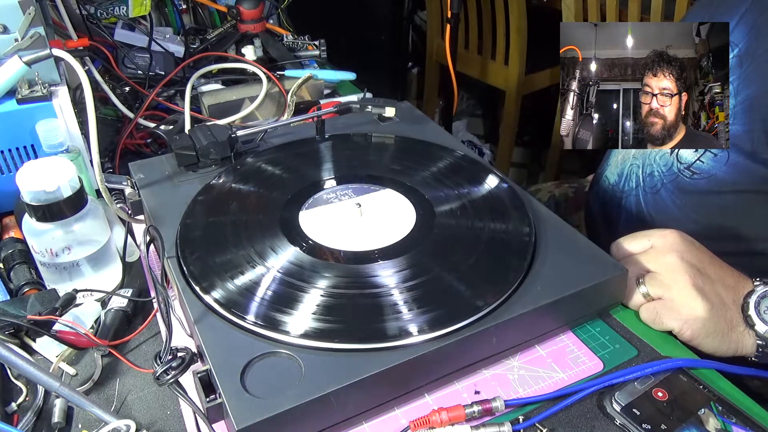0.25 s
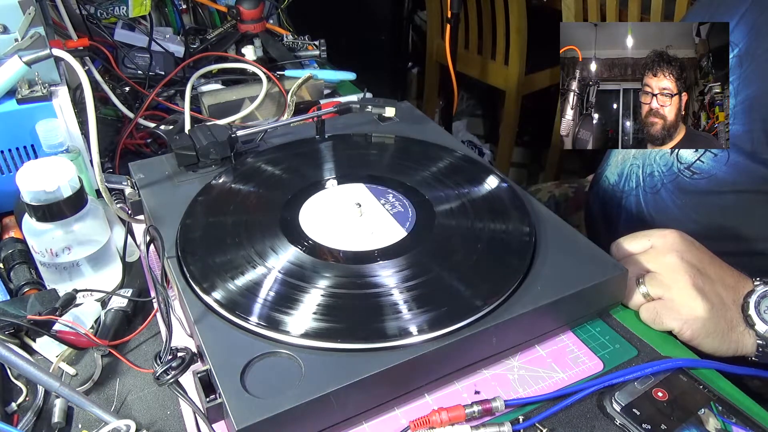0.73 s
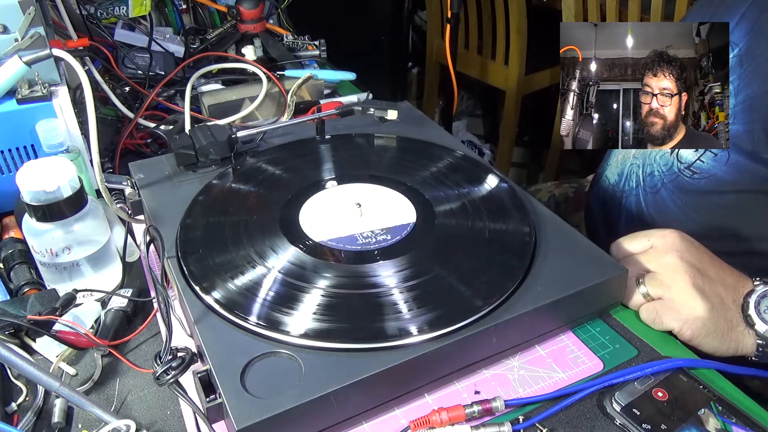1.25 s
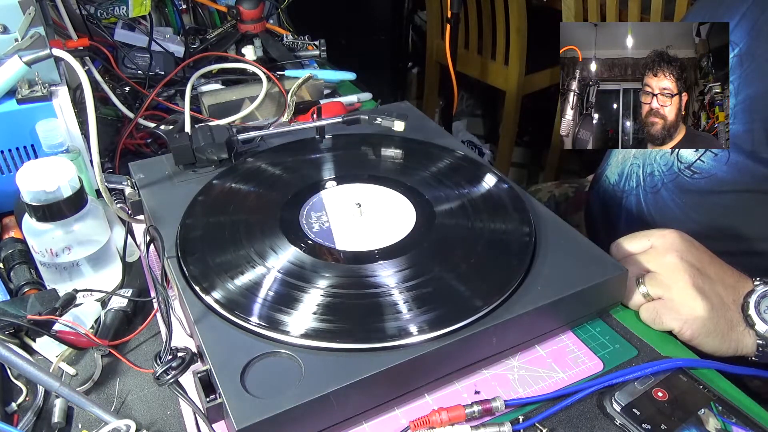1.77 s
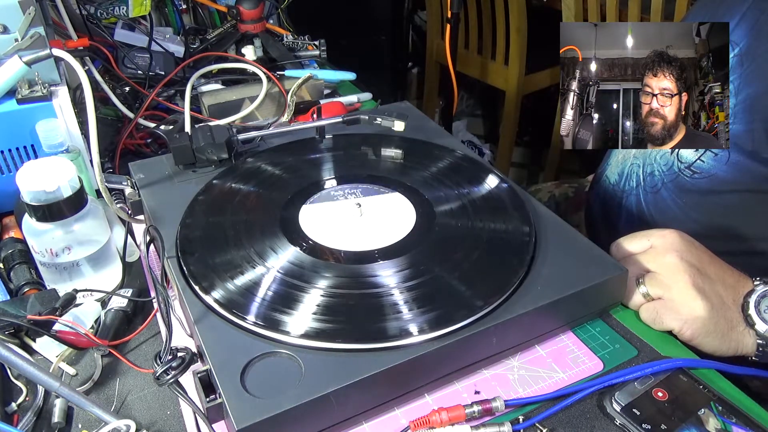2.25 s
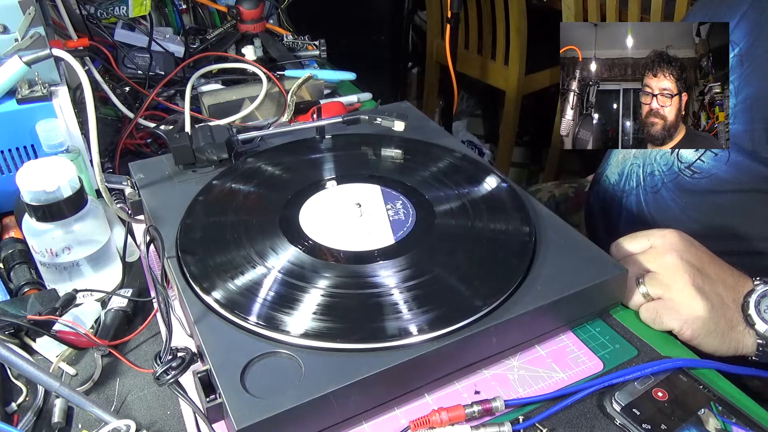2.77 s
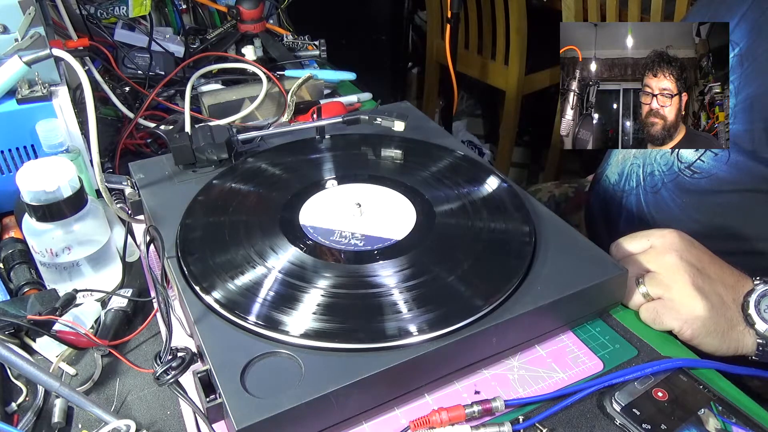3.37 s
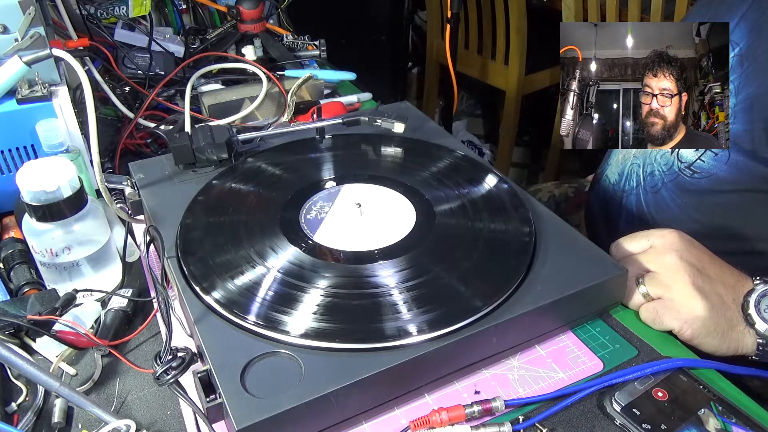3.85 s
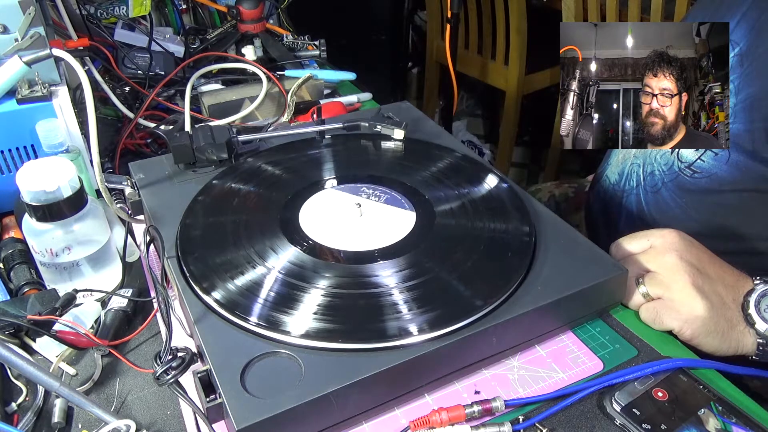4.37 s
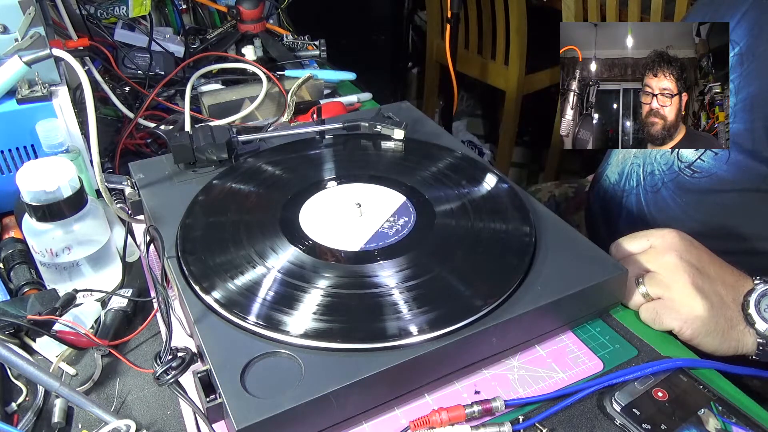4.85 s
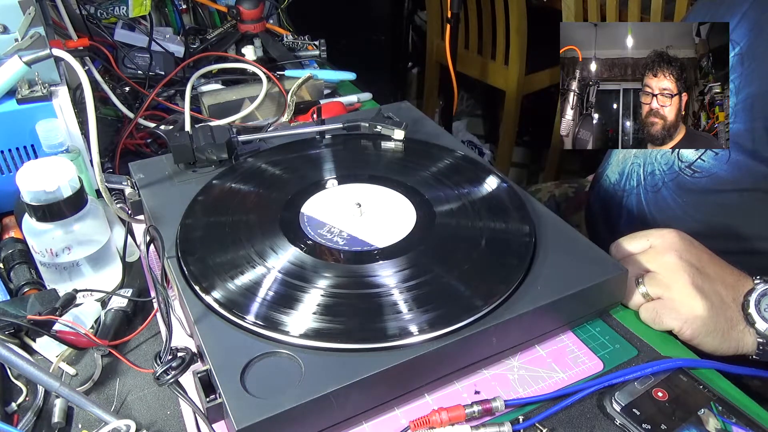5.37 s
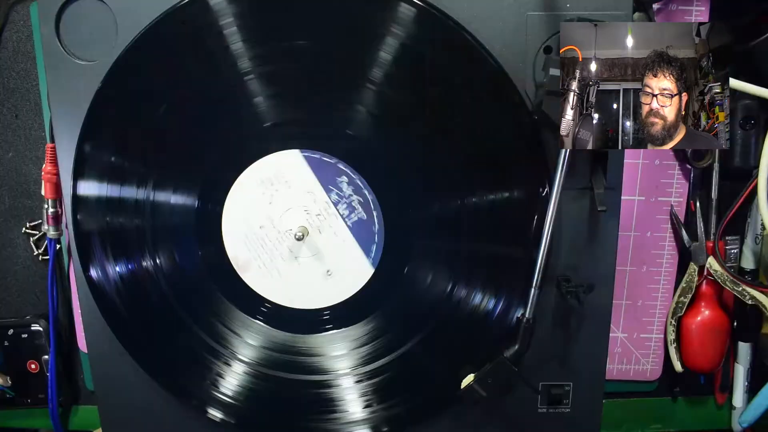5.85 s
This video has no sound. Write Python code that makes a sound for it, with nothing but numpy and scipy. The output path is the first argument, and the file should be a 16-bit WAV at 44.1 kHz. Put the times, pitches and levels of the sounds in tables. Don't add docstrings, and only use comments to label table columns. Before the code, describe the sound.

Close on a cluttered bench in a quiet room, a turntable mechanism works over constant low hum and faint airy fan hiss. Tiny cam and slide taps come sparsely, then one clear dry tick. Soon after, a low thump leads into a bright hard snap, and a third of a second later a heavier, hollow clunk. Afterwards only hum and hiss remain, with a faint distant bird.

```python
import sys
import numpy as np
from scipy import signal
from scipy.fft import rfft, irfft, next_fast_len
from scipy.io import wavfile
from scipy.ndimage import uniform_filter1d, map_coordinates

SR = 44100
rng = np.random.default_rng(int(sys.argv[2]) if len(sys.argv) > 2 else 0)


def wav_out(sig):
    wavfile.write(sys.argv[1], SR, np.round(np.clip(np.atleast_2d(sig).T, -1, 1) * 32767).astype(np.int16))


def invert_db(x):
    u = np.asarray(x, float) / 20
    return 10 ** u


N = 269451

# f/Hz, rms level/dB, unsteadiness/0-1
HUM_LINES = [(50, -46.5, 0.24), (121.4, -52.5, 0.02), (150, -52, 0.12), (101.8, -61.5, 1),
             (173.3, -74.5, 0.5)]
# f/Hz, level/dB per Hz
RUMBLE_SPECTRUM = [(18, -2), (33, -6), (46, -4.5), (90, -6.5), (108, -26), (155, -14.5), (185, -18.5),
                   (230, -14), (380, -27), (500, -38), (1000, -74)]
AIR_SPECTRUM = [(150, -20), (300, -10), (550, -5), (800, -11), (1050, -7.5), (1600, -11), (2200, -13),
                (3300, -10), (4500, -9), (6000, -3.5), (8000, -11.5), (11900, -10), (14000, -16.5),
                (16000, -19)]
WHIRR_SPECTRUM = [(500, -10), (750, 7), (1050, -4), (1500, 3), (2200, -27)]
# f/Hz, width/Hz, level/dB
ROOM_RIDGES = [(596, 265, -4.5), (3800, 83, 6.5), (3863, 100, -6), (4484, 110, 7), (5490, 140, -9),
               (5970, 100, 0.5), (6895, 59, 6.5), (2205, 40, -4), (7920, 40, 6.5), (1780, 130, -3.5),
               (8580, 230, 5), (9100, 76, 7), (9540, 40, -12), (10000, 53, -11)]
# middle t/s, length/s, level/dB
DRONE_SWELLS = [(.93, 0.21, -57.5), (2.62, 0.66, -59.5), (2.87, 0.098, -50), (3.05, 0.072, -58),
                (5.79, 0.15, -48), (6, 0.13, -53.5)]
DRONE_HZ, DRONE_REST_DB = 221.6, -68.5
# middle t/s, length/s, level/dB
WHIRR_SWELLS = [
    (0, 0.2, -67),
    (2.45, 0.34, -61.5),
    (2.98, 0.32, -56),
    (4.2, 0.67, -58),
]
WHIRR_REST_DB = -59

# t/s, peak level/dB
LATCH_TAPS = [(0, -47), (.066, -46), (3.344, -47), (4.1025, -37.5), (4.258, -46), (4.396, -40)]
CAM_THUDS = [(.883, -46.5), (1.177, -39), (1.196, -43), (2.379, -45), (2.736, -31.5), (2.759, -48),
             (3.048, -47.5)]
SLIDE_NUDGES = [
    (1.5975, -32),
    (1.607, -38),
    (1.903, -46),
]
LEVER_TICKS = [
    (3.827, -18.5),
    (3.847, -40),
    (3.864, -42),
]
# t/s, peak level/dB, t60/s, click over body/dB, bench over body/dB
LATCH_SNAPS = [
    (4.177, -46, 0.12, -8, 19),
    (4.214, -34.5, 0.077, -4, 1),
    (4.2872, -39, 0.023, 14, -15),
    (4.2895, -8, 0.0095, 1, -6),
    (4.294, -22, 0.05, 3, 1),
    (4.302, -28, 0.088, 2, 3.5),
    (4.318, -42.5, 0.23, 5, 4),
]
PAWL_DROPS = [
    (4.532, -31, 0.035, -22, 4),
    (4.558, -30, 0.031, -14, 4),
    (4.5615, -12, 0.023, -24, -18),
    (4.575, -28.5, 0.03, -20, 5.5),
    (4.59, -32, 0.029, -25, -3),
]
LIFT_CLUNKS = [
    (4.607, -23, 0.025, -0.5, -12),
    (4.6118, -8, 0.039, -14.5, -8.5),
    (4.618, -20, 0.027, -2, -4),
    (4.626, -21, 0.047, 1, -7),
    (4.641, -27, 0.036, 5, -2),
    (4.655, -38, 0.064, -4, 7),
]

# f/Hz, width/Hz, level/dB
LATCH_MODES = [(426, 170, 4), (599, 150, -1.5), (847, 330, 2), (1056, 95, 7.5), (1315, 160, 6.5),
               (1565, 360, 5), (2030, 150, 0.5), (2450, 150, -23), (2760, 90, -19), (3320, 100, 0.5),
               (3960, 110, 3), (5540, 190, 4), (7200, 330, -26)]
CAM_MODES = [(290, 73, 2.5), (437, 100, -4), (570, 150, -7), (784, 54, 1.5), (921, 250, 0),
             (1170, 130, -3.5), (1530, 220, -8.5)]
SLIDE_MODES = [(447, 50, -3.5), (810, 24, 6.5), (1010, 120, -10), (1170, 55, 0), (1500, 200, -8.5),
               (2200, 150, -22)]
LEVER_MODES = [(493, 72, -3.5), (772, 42, 2), (1020, 22, -3), (1110, 17, 2.5), (1187, 63, 3),
               (1417, 63, -2.5), (1673, 78, -2)]
PAWL_MODES = [(508, 54, -4.5), (740, 100, -5), (770, 44, 6.5), (926, 90, -3.5), (1050, 100, -13),
              (1245, 100, -13), (1590, 94, -12), (1900, 300, -20), (2460, 170, -27)]
PLINTH_MODES = [(432, 59, -3), (512, 18, -2), (712, 24, -1.5), (790, 40, -4), (914, 65, 5), (1023, 130, -5),
                (1193, 190, 0.5), (1495, 81, -4), (1627, 290, -4.5), (1833, 19, -7), (2450, 83, -11.5),
                (3200, 170, -8), (4026, 31, -8)]
BENCH_MODES = [(92, 24, 1), (139, 180, -13), (178, 27, 6), (255, 33, 2), (292, 67, 3.5), (337, 14, -1)]
# f/Hz, level/dB
CLICK_SPECTRUM = [(1200, -11), (2500, 0.5), (4500, -2.5), (6500, -4), (8500, -9.5), (11000, -12.5),
                  (16000, -32)]
SOFT_HZ = 5100

# t/s, peak level/dB, first f/Hz, settled f/Hz, t60/s
THUMPS = [
    (4.182, -11.5, 119, 59.5, 0.11),
    (4.216, -22, 60, 41.7, 0.11),
    (4.239, -26, 110, 50, 0.16),
    (4.288, -17, 208, 52, 0.11),
    (4.595, -27.5, 110, 88, 0.13),
    (4.6241, -5.5, 240, 150, 0.018),
]
BEND_S = .0059
# t/s, level/dB, f/Hz that the blow favours
SLAMS = [
    (4.2954, -25, 150),
    (4.4, -36, 132),
    (4.625, -18, 150),
]
# f/Hz, level/dB, t60/s
TOP_MODES = [(84, 3, .2), (140, -2.5, 0.11), (219.3, 1, 0.23), (281, 4, 0.1)]
# t/s, length/s, first f/Hz, last f/Hz, level/dB
BIRD_NOTES = [
    (1.29, .09, 2700, 2240, -59),
    (1.876, .07, 2780, 2640, -63),
    (1.99, .039, 2320, 2240, -59),
    (2.53, .055, 3100, 2700, -59),
    (2.63, .09, 2600, 2300, -63),
    (3.9, .07, 2150, 2380, -60),
    (5.335, .21, 4000, 3340, -58),
]


def unit(x):
    return x / np.sqrt(np.mean(x ** 2) + 1e-20)


def along(points, hz):
    f, value = np.transpose(points)
    return np.interp(np.log(hz + 1), np.log(f + 1), value)


def wobble(rate):
    knots = rng.standard_normal(int(N * 40 / SR) + 4)
    return map_coordinates(knots, [np.arange(N) * min(rate, 40) / SR])


def filtered(x, response):
    m = next_fast_len(len(x) + 8192)
    return irfft(rfft(x, m) * response(np.fft.rfftfreq(m, 1 / SR)), m)[:len(x)]


def resonances(modes):
    def response(f):
        return sum((-1) ** k * invert_db(db) * 1j * f * width / (centre ** 2 - f * f + 1j * f * width)
                   for k, (centre, width, db) in enumerate(modes))
    return response


def noise(spectrum):
    return unit(filtered(rng.standard_normal(N), lambda hz: invert_db(along(spectrum, hz))))


def swells(rows, rest_db):
    t = np.arange(N) / SR
    return invert_db(rest_db) + sum(invert_db(db) * 2 ** (-(2 * (t - s) / length) ** 2) for s, length, db in rows)


def sine(cycles):
    return np.sin(2 * np.pi * cycles)


def place(out, s, sound):
    out[round(s * SR):][:len(sound)] += sound


def contacts(rows, body, held, rise_s, rough, after_db, dull_db):
    out, t = np.zeros(N + SR), np.arange(SR // 4) / SR
    for s, db, t60, click_db, bench_db in rows:
        shake = rng.standard_normal((4, len(t)))
        ragged = invert_db(3.5 * unit(uniform_filter1d(shake[3], size=110)))
        rise = (1 - np.exp(-t / rise_s)) ** 2
        shape = rise * invert_db(-60 * np.maximum(t - held * t60, 0) / max(t60, .005))

        def fade(width):
            return shape + rise * invert_db(after_db) * np.exp(-np.pi * width * t)

        def rattle_response(hz):
            return resonances(body)(hz) / (1 + 1j * hz / SOFT_HZ) ** 2

        def click_response(hz):
            return invert_db(along(CLICK_SPECTRUM, hz) - dull_db * np.log2(1 + hz / 3000))

        tones = sum(invert_db(level + rng.normal()) * fade(width) * sine(hz * t + rng.random())
                    for hz, width, level in body)
        rattle = filtered(shake[0] * shape, rattle_response)
        click = filtered(shake[1] * ragged * (shape + invert_db(5) * fade(16)), click_response)
        knock = filtered(shake[2] * shape, resonances(BENCH_MODES))
        shares = [1, rough, invert_db(click_db), invert_db(bench_db)]
        sound = sum(g * v / np.linalg.norm(v) for g, v in zip(shares, (tones, rattle, click, knock)))
        place(out, s, invert_db(db - 9.0) * np.linalg.norm(shape) * sound)
    return out[:N]


def alike(rows, t60, click_db, bench_db):
    return [(s, db, t60, click_db, bench_db) for s, db in rows]


def hum():
    t = np.arange(N) / SR
    lines = np.zeros(N)
    for hz, db, loose in HUM_LINES:
        level = invert_db(db) * np.sqrt(2) * (1 + 1.5 * loose * wobble(8.1))
        lines += level * np.sin(2 * np.pi * hz * t + loose * wobble(13))
    return lines + invert_db(-48.5 + 0.43 * wobble(4.8)) * noise(RUMBLE_SPECTRUM)


def drone():
    t = np.arange(N) / SR
    return swells(DRONE_SWELLS, DRONE_REST_DB) * np.sin(2 * np.pi * DRONE_HZ * t + 1.6 * wobble(7))


def hiss():
    t = np.arange(SR // 4) / SR
    echoes = rng.standard_normal(len(t)) * invert_db(-27.5 - 60 * t / 0.2)
    echoes[0] = 1
    comb = np.abs(rfft(echoes))
    comb /= uniform_filter1d(comb, size=40)
    comb_hz = np.linspace(0, SR / 2, len(comb))

    def room(f):
        ridges = invert_db(sum(db * 2 ** (-(2 * (f - c) / width) ** 2) for c, width, db in ROOM_RIDGES))
        return ridges * np.interp(f, comb_hz, comb) ** (f / (f + 500))

    air = filtered(noise(AIR_SPECTRUM), room)
    return invert_db(-48.5 + 0.27 * wobble(3.37)) * unit(air)


def whirr():
    flutter = invert_db(1.1 * wobble(21))
    return swells(WHIRR_SWELLS, WHIRR_REST_DB) * invert_db(-8.5) * flutter * noise(WHIRR_SPECTRUM)


def latch_taps():
    rows = alike(LATCH_TAPS, 0.1, click_db=4.5, bench_db=-20)
    return contacts(rows, LATCH_MODES, held=0.036, rise_s=0.00056, rough=1.6, after_db=-12, dull_db=5.5)


def cam_thuds():
    rows = alike(CAM_THUDS, 0.03, click_db=-16, bench_db=-6)
    return contacts(rows, CAM_MODES, held=0.27, rise_s=0.00041, rough=0.89, after_db=21, dull_db=-4)


def birds():
    out = np.zeros(N + SR)
    for s, length, first_hz, last_hz, db in BIRD_NOTES:
        u = np.linspace(0, 1, round(length * SR))
        waver = uniform_filter1d(rng.standard_normal((2, SR // 4)), size=300)[:, :len(u)] * np.sqrt(300)
        pitch = last_hz + (first_hz - last_hz) * (1 - u) ** 4 + 55 * waver[0]
        swell = invert_db(db + 4 * waver[1]) * np.sin(np.pi * u) ** 0.39
        place(out, s, swell * sine(np.cumsum(pitch) / SR))
    return out[:N]


def slide_nudges():
    rows = alike(SLIDE_NUDGES, 0.035, click_db=-3, bench_db=-30)
    return contacts(rows, SLIDE_MODES, held=0.22, rise_s=0.0011, rough=0.98, after_db=-12, dull_db=7.0)


def lever_ticks():
    rows = alike(LEVER_TICKS, .021, click_db=-16.5, bench_db=-18)
    return contacts(rows, LEVER_MODES, held=0.49, rise_s=0.00072, rough=0.59, after_db=-11, dull_db=8)


def latch_snaps():
    return contacts(LATCH_SNAPS, LATCH_MODES, held=0.047, rise_s=0.00015, rough=0.87,
                    after_db=-3, dull_db=-0.5)


def thumps():
    out, t = np.zeros(N + SR), np.arange(SR // 2) / SR
    for s, db, first_hz, last_hz, t60 in THUMPS:
        pitch = last_hz + (first_hz - last_hz) * np.exp(-t / BEND_S)
        swell = (1 - np.exp(-t / 0.0022)) * invert_db(db - 60 * (t / t60) ** 1.24)
        place(out, s, -swell * sine(np.cumsum(pitch) / SR))
    return out[:N]


def bench_slams():
    out, t = np.zeros(N + SR), np.arange(SR // 2) / SR
    for s, db, push_hz in SLAMS:
        ring = np.zeros(len(t))
        for hz, level, t60 in TOP_MODES:
            driven_db = level - 13 * np.log2(hz / push_hz) ** 2
            ring += invert_db(driven_db - 60 * (t / t60) ** 1.11) * sine(hz * t)
        place(out, s, -invert_db(db) * (1 - np.exp(-t / 0.0046)) * ring)
    return out[:N]


def pawl_drops():
    return contacts(PAWL_DROPS, PAWL_MODES, held=0.25, rise_s=0.00053, rough=0.74, after_db=-14, dull_db=8)


def lift_clunks():
    return contacts(LIFT_CLUNKS, PLINTH_MODES, held=.24, rise_s=0.00076, rough=0.54, after_db=-6, dull_db=1.7)


def scene():
    steady = hum() + drone() + hiss() + whirr()
    small = latch_taps() + cam_thuds() + slide_nudges() + lever_ticks()
    large = latch_snaps() + pawl_drops() + lift_clunks()
    bench = thumps() + bench_slams()
    return (steady + small + birds() + large + bench)[None]


def top_cut(x):
    return signal.sosfilt(signal.butter(12, 16780, fs=SR, output="sos"), x)


def record(dry):
    kept = filtered(dry[0], lambda hz: 1 / (1 + (hz / 15720) ** 400))[None]
    return top_cut(kept)


dry = scene()
out = record(dry)
wav_out(out)
```